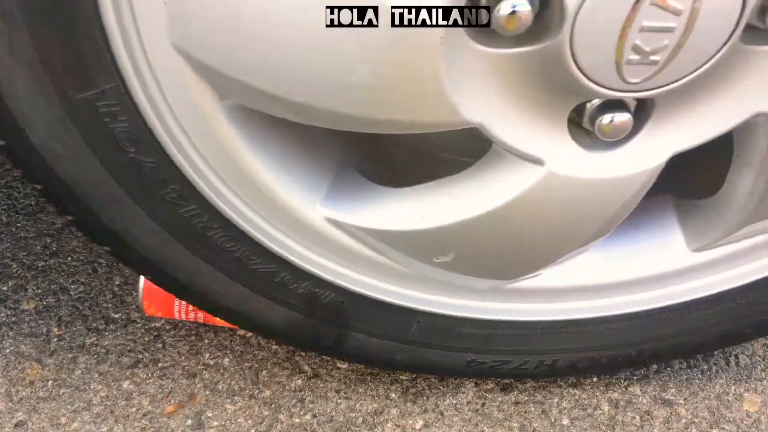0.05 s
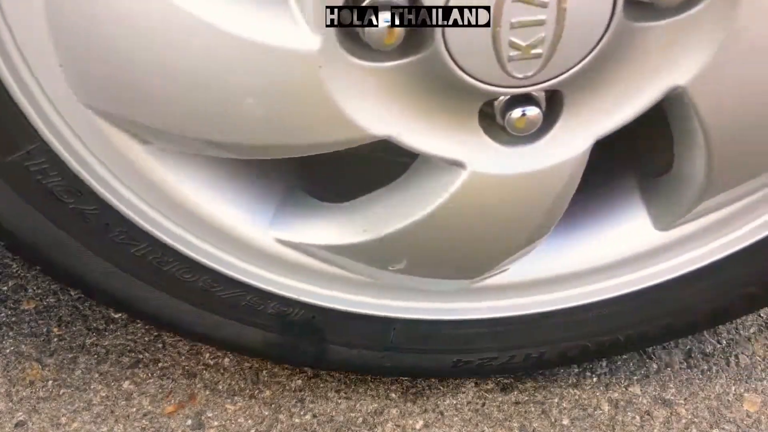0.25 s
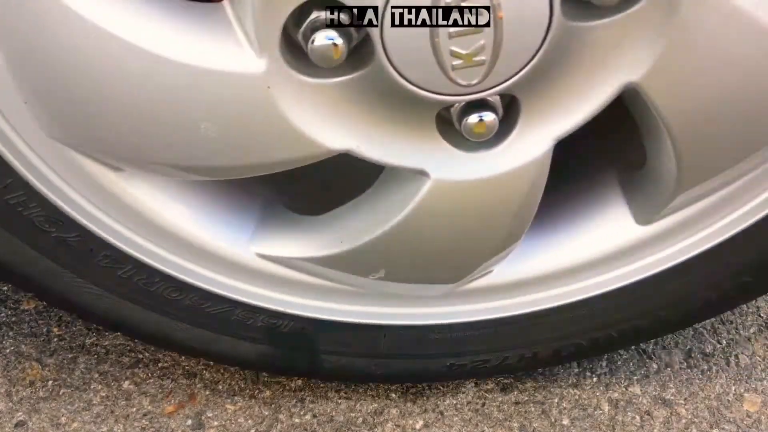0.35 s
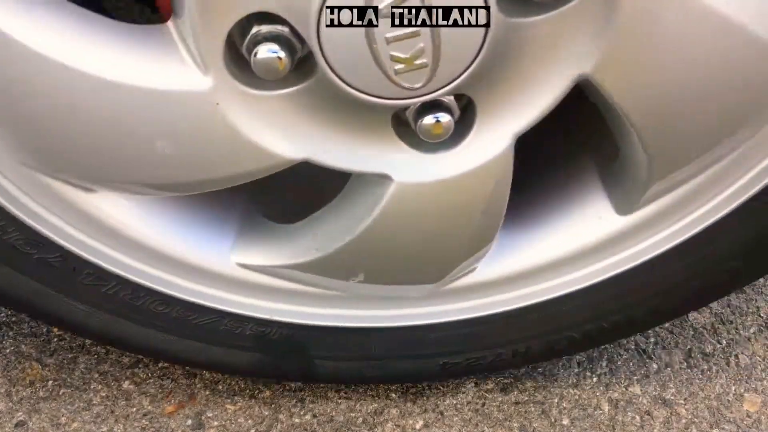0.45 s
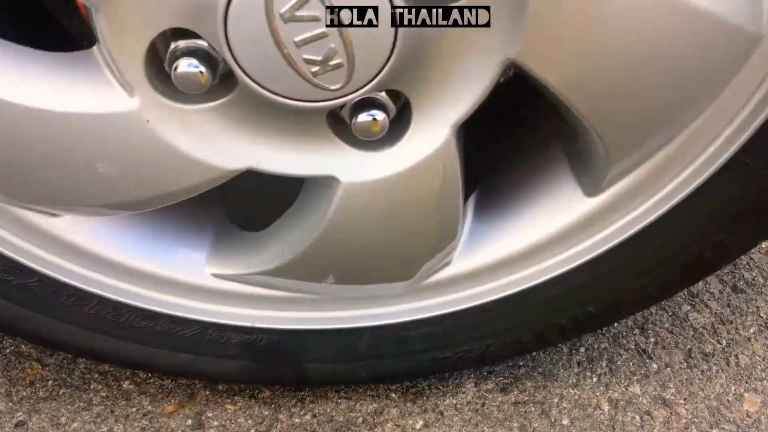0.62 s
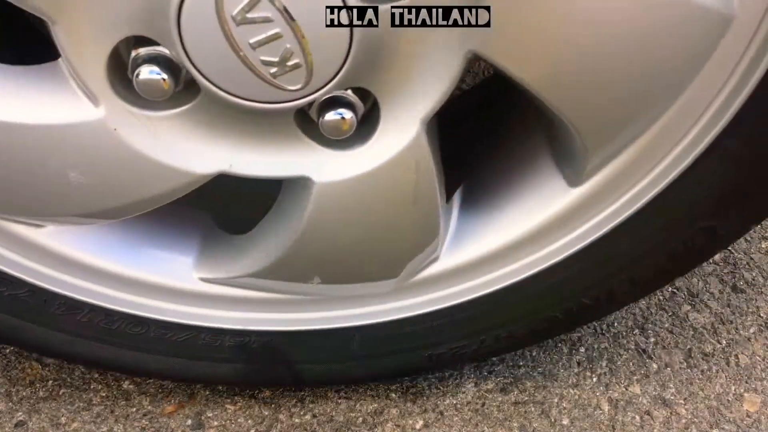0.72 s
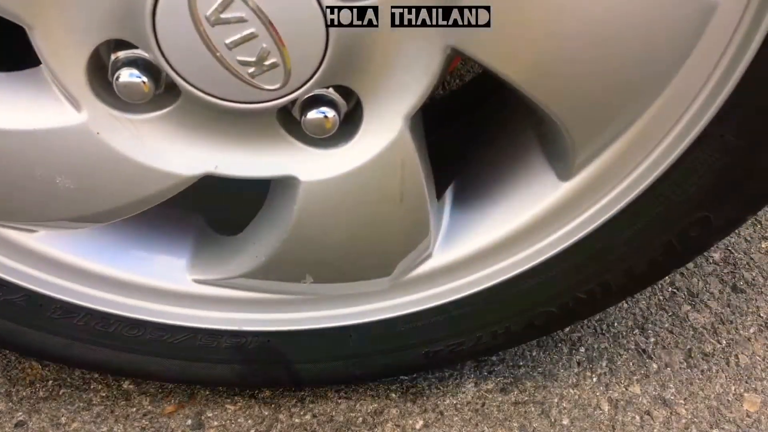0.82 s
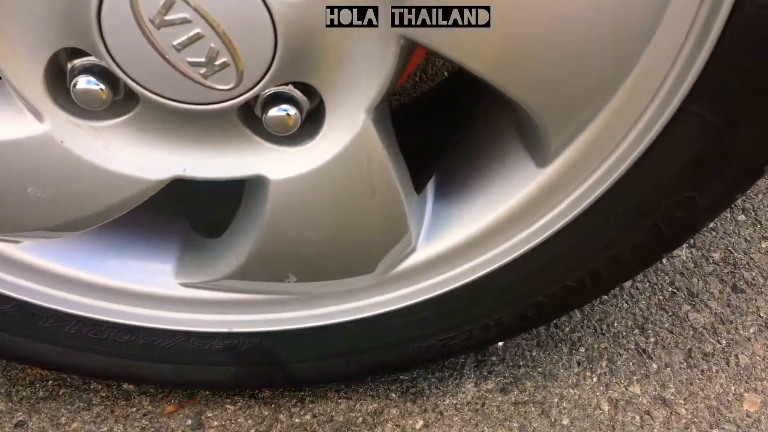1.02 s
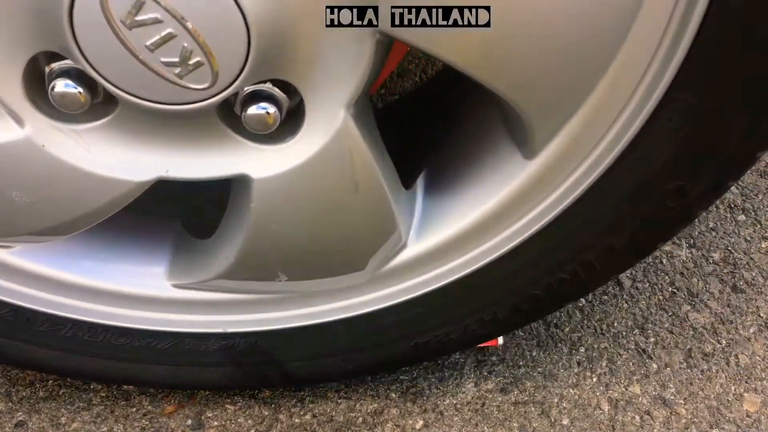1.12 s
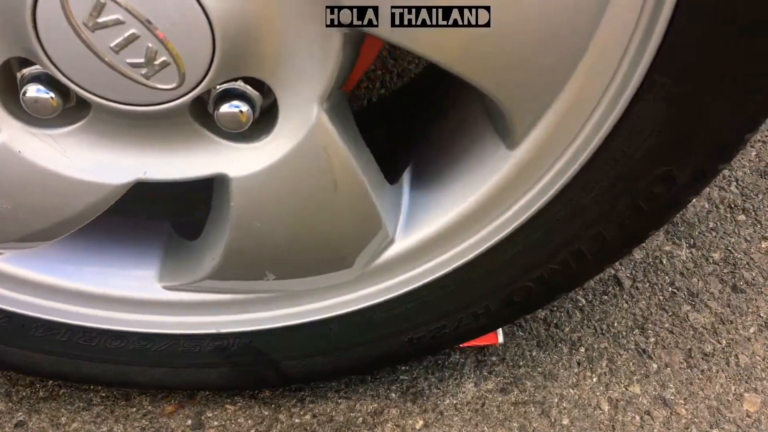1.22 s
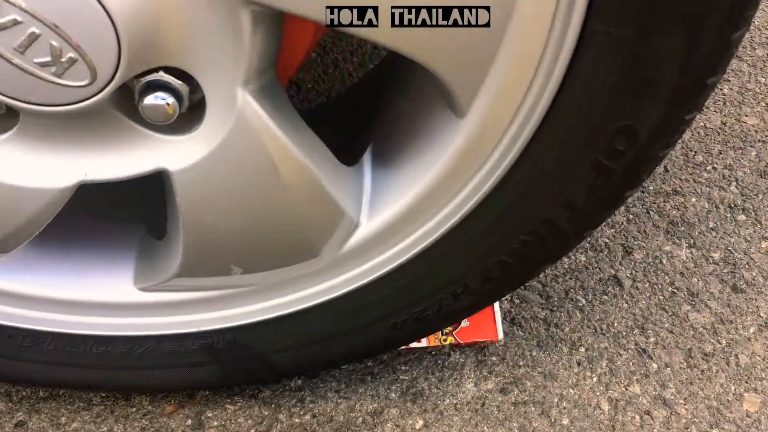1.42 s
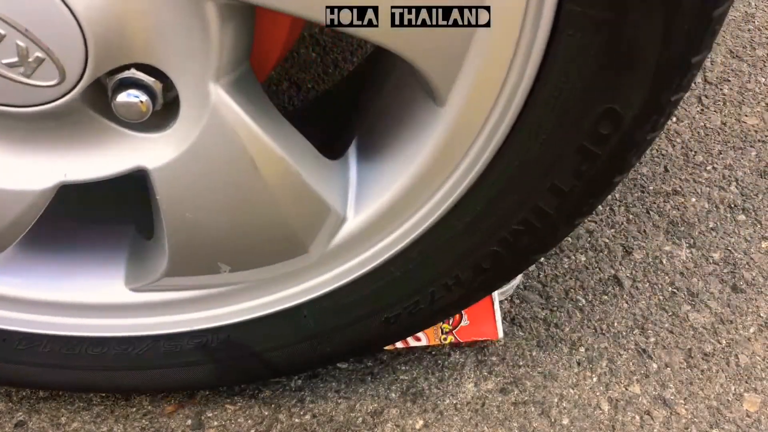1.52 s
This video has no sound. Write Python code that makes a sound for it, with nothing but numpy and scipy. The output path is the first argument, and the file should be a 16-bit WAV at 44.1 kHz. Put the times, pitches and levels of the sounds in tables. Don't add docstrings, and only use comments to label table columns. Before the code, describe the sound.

Cardboard tube bursts under a slow rolling tyre with a hissing rush, sharp pop and later snaps

```python
import sys
import numpy as np
from scipy import signal
from scipy.io import wavfile
from scipy.ndimage import uniform_filter1d, map_coordinates

SR = 44100
rng = np.random.default_rng(int(sys.argv[2]) if len(sys.argv) > 2 else 0)


def put_to_file(sound):
    columns = np.atleast_2d(sound).T
    safe = np.clip(columns, -1, 1)
    whole_steps = np.round(safe * 32767)
    wavfile.write(sys.argv[1], SR, whole_steps.astype(np.int16))


def boost_factor(decibels):
    exponent = np.asarray(decibels, float) / 20
    return 10 ** exponent


N = 68355

# time_s, level_db
FLOW = [
    (0.03, -45.5),
    (0.136, -36.5),
    (0.192, -34),
    (0.292, -26.5),
    (0.346, -22.5),
    (0.36, -27.5),
    (0.37, -27),
    (0.378, -38),
    (0.42, -61),
]
# pitch_hz, width_hz, level_db, reached_s
GAP_WHISTLES = [(2670, 750, -1, 0.26), (5600, 760, 0.5, 0.17), (7140, 390, -4.5, 0.27),
                (8530, 350, 0.5, 0.26), (8980, 470, 3, 0.27), (10060, 260, 0.5, 0.32),
                (10880, 380, -1.5, 0.31), (11700, 370, -0.5, 0.11), (13760, 350, 3, 0.21),
                (14450, 350, 2, 0.31), (15400, 560, 3, 0.273)]
# pitch_hz, width_hz, level_db, centre_s, length_s
BRIEF_WHISTLES = [(4170, 120, -7.5, 0.194, 0.039), (3700, 77, -9, 0.225, .025), (4230, 130, -11, .25, .015),
                  (5100, 92, -15, 0.246, 0.029), (3350, 120, -9, 0.276, 0.017),
                  (3100, 110, -6.5, 0.274, 0.026), (1960, 150, -9, 0.3, 0.019), (4930, 90, -13, 0.282, .04),
                  (4060, 300, -4, 0.3097, 0.025), (3446, 120, -11, 0.292, 0.029),
                  (3050, 180, -8.5, 0.337, .016), (5150, 150, -9, 0.65, .008), (6960, 120, -7, 0.322, .02),
                  (6430, 90, -14, 0.3, 0.02), (8500, 87, -13.5, 0.31, 0.017),
                  (9640, 190, -5.5, 0.327, .025), (10300, 70, -6, 0.314, 0.028), (14760, 90, -8, .32, .025)]
# pitch_hz, width_hz, depth (0-1)
GAP_NOTCHES = [(4650, 300, .6), (5550, 350, 0.85), (7800, 190, 0.8), (11250, 450, 1), (11950, 200, 0.7),
               (12850, 250, .9)]
WHISTLE_APPROACH_S, WHEEL_ECHO_T60_S, WHEEL_ECHO_SHARE = 0.094, 0.03, .45
TREBLE_HZ, TREBLE_OPENS_S, TREBLE_SHUT = 14100, 0.175, 0.79
GAP_GLIDE = .002

CHIRP_START_S, CHIRP_LENGTH_S, CHIRP_DB, CHIRP_FADE_DB = .114, 0.046, -27, -5
CHIRP_START_HZ, CHIRP_RISE_HZ_PER_S = 234, 5570
KNOCK_HZ, KNOCK_DB = 163, -30
# centre_s, level_db, length_ms
DENTS = [
    (.1142, -28, 2.0),
    (.1683, -34, 2.2),
]

# start_s, push_db, contact_ms, rebound (0-1)
POP = [(0.3543, -3.5, 0.4, 0.6), (0.3552, -10.5, 0.24, 0.3), (.3581, -9.5, .95, 0.2),
       (0.3635, -4.5, 0.19, 0.1), (.3672, -9, .7, 0.01), (.3678, -8.5, .8, .01), (0.3742, -15.5, 1.5, 0.3),
       (0.3772, -21, 1.54, 0), (.3915, -19, 1.4, 0.2), (.3948, -27, 1.3, .8), (.4040, -20, 2.0, 0.62),
       (0.4108, -26, 1.98, .9), (.443, -32, 2.24, 0.64)]
# centre_s, level_db, length_ms
BULGES = [
    (.3558, -16, .8),
    (.3650, -14.5, 2.6),
    (.3666, -8, .4),
    (.3722, -14, 2.0),
]
# pitch_hz, level_db, t60_s
BODY_MODES = [(77.8, -23.5, 0.62), (147, -28, 0.26), (206, -48, 0.043), (266.5, -27, 1), (332, -26, 0.11),
              (470, -22, 0.048), (748, -35, 0.077), (1107, -30, 0.024), (1560, -30.5, 0.016),
              (2475, -27, 0.025), (3460, -34, 0.017)]
BODY_HIGHPASS_HZ = 77
SCUFF_DB, SCUFF_T60_S, SCUFF_HZ = -37.5, 0.074, 1370

# start_s, peak_db, pitch_hz, treble_db, t60_s
SNAPS = [(.031, -35, 1600, -21, 0.037), (.060, -31.5, 2030, -17, 0.035), (0.064, -31, 1980, -18, .02),
         (0.0727, -24, 1810, -28, 0.02), (0.0765, -26.5, 1960, -28, 0.02), (0.0833, -31, 1950, -25, 0.013),
         (0.0872, -35, 2040, -23, 0.022), (0.0951, -30, 1930, -25, 0.033), (0.1142, -30, 1306, -25, 0.032),
         (0.1669, -30.5, 1280, -15, 0.013), (0.436, -34, 900, -15, 0.034), (0.5439, -45, 1320, -4.5, 0.016),
         (0.7198, -43, 3000, -1, 0.0069), (0.739, -36.5, 1324, -19, 0.044), (0.799, -36, 1270, -10, 0.045),
         (0.886, -38.5, 1370, -11, 0.021), (1.076, -33, 1280, -27, 0.054), (1.106, -26, 1580, -23, 0.014),
         (1.109, -31.5, 1136, -32, 0.03), (1.1119, -31, 1166, -32, 0.041),
         (1.1516, -31, 1910, -11.5, 0.027), (1.1545, -40, 2500, -19, .03), (1.197, -40, 3700, -22, .02),
         (1.2118, -22, 1970, -19, 0.021), (1.2122, -36.5, 3850, -18, 0.012),
         (1.2141, -29, 2760, -20, 0.011), (1.2164, -34.5, 1324, -20, 0.061),
         (1.2214, -34, 2030, -24, 0.037)]
SNAP_TICK_DB, SNAP_THUD_DB = -3, -27
SNAP_TAIL_DB, SNAP_TAIL_RATIO = -15.5, 2.6
# centre_s, level_db, length_ms
CRACKS = [
    (1.1056, -24, .19),
    (1.1516, -35, .14),
    (1.1630, -39, .2),
    (1.2128, -30, .13),
]
CRACK_BEFORE, CRACK_AFTER = .3, .35

# start_s, peak_db
TICKS = [(.7585, -38), (.7962, -39), (.8168, -37), (.8236, -33), (.832, -39), (.838, -39), (.8414, -34),
         (.8608, -29.5), (.8625, -37)]
TICK_HZ, TICK_T60_S = 3200, .0045
# centre_s, level_db, length_s
PUFFS = [(0.566, -54, 0.011), (0.706, -51, 0.0063), (0.819, -52.5, 0.026), (0.851, -51.5, 0.0094),
         (0.992, -49.5, 0.007), (1.133, -52.5, 0.01), (1.275, -50, 0.01), (1.414, -50, 0.0075),
         (1.501, -58, 0.004)]
PUFF_HZ, PUFF_AIR_DB = 3160, -7.5
GRIT_PER_S, GRIT_DB, GRIT_SPREAD_DB, GRIT_HZ = 660, -59.5, 3.5, 3200

FIRING_HZ, FIRING_DB, FIRING_SCATTER_DB = 29.07, -51, 1.5
# pitch_hz, width_hz, level_db
EXHAUST = [
    (59.7, 30.4, 2),
    (82.7, 24, -2),
    (128.7, 37, -3.5),
    (204, 40, -10),
    (434, 43, -18.5),
]
# pitch_hz, density_db (per Hz)
BAY = [(18, -31), (30, 3), (209, -3), (318, -12.5), (459, -9), (775, -10.5), (1310, -14.5), (1610, -14.5),
       (15800, -38)]
BAY_DB, BAY_SWELL_DB, BAY_FLICKER_DB = -47.5, .4, 1.5
# pitch_hz, width_hz, level_db
BAY_HUMS = [
    (456, 61, -65),
    (1280, 104, -58.5),
    (2526, 67, -67.5),
    (5010, 160, -68.5),
]
HUM_FLICKER_DB = 1.2

# time_s, gain_db
GAIN = [
    (0, 2.5),
    (.36, 2),
    (.40, 2),
    (.55, -3.5),
    (.655, -6.5),
    (.69, 2),
    (1.55, 1),
]
GRIT_GAIN_SHARE, MIC_GAIN_SHARE = .7 - .5, 0.96
MIC_HISS_DB = -66.5
PHONE_TOP_HZ = 15680


def level(x, db):
    return x * boost_factor(db) / np.sqrt(np.mean(x ** 2))


def curve(table):
    return np.interp(np.arange(N) / SR, [row[0] for row in table], [row[1] for row in table])


def white():
    return rng.standard_normal(N)


def band(x, hz, width):
    return signal.lfilter(*signal.iirpeak(min(hz, .45 * SR), hz / width, fs=SR), x)


def steep(x, hz, width):
    return band(band(x, hz, width), hz, width * 1.34)


def ring(x, hz, t60):
    radius = np.exp(-np.log(1000) / (t60 * SR))
    angle = 2 * np.pi * hz / SR
    return signal.lfilter([0, np.sin(angle)], [1, -2 * radius * np.cos(angle), radius * radius], x)


def fade(t, t60):
    return (t >= 0) * boost_factor(-60 * np.clip(t, 0, 2) / t60)


def bump(s, ms):
    return np.exp(-((np.arange(N) / SR - s) / (ms / 2000)) ** 2)


def walk(rate):
    hold = int(SR / rate)
    steps = np.repeat(rng.standard_normal(N // hold + 1), hold)
    return 1.33 * uniform_filter1d(uniform_filter1d(steps, hold), hold)[:N]


def leak():
    t = np.arange(N) / SR
    air = level(band(white(), 6800, 18300), 0)
    for hz, width, db, s in GAP_WHISTLES:
        near = -8 * np.clip(((t - s) / WHISTLE_APPROACH_S) ** 2, 0, 1.5)
        air = air + boost_factor(db - 5 + near + walk(39.6)) * level(band(white(), hz, width), 0)
    for hz, width, db, s, length in BRIEF_WHISTLES:
        swell = np.exp(-((t - s) / length) ** 2)
        air = air + boost_factor(db) * swell * level(steep(white(), hz, width), 0)
    for hz, width, depth in GAP_NOTCHES:
        air = air - depth * band(air, hz, width)
    air = air / np.std(air[int(.3 * SR):int(.34 * SR)])
    echo = rng.standard_normal(2000) * fade(t[:2000], WHEEL_ECHO_T60_S)
    echoed = signal.fftconvolve(air, echo / np.linalg.norm(echo))[:N]
    air = np.sqrt(1 - WHEEL_ECHO_SHARE ** 2) * air + WHEEL_ECHO_SHARE * echoed
    shut = TREBLE_SHUT * np.clip((TREBLE_OPENS_S - t) / 0.025, 0, 1)
    air = air - shut * band(air, TREBLE_HZ, 9600)
    drift = np.cumsum(GAP_GLIDE * np.clip((t - .27) / .1, -2, 1))
    air = map_coordinates(air, [np.arange(N) + drift], mode="mirror")
    return air * boost_factor(curve(FLOW)) * (t < FLOW[-1][0])


def chirp():
    t = np.arange(N) / SR - CHIRP_START_S
    shape = np.clip(np.minimum(t / .001, (CHIRP_LENGTH_S - t) / 0.0017), 0, 1)
    shape = shape * boost_factor(CHIRP_FADE_DB * np.clip(t / CHIRP_LENGTH_S, 0, 1))
    phase = 2 * np.pi * (CHIRP_START_HZ * t + CHIRP_RISE_HZ_PER_S * t ** 2 / 2) + 0.27 * walk(300)
    tone = boost_factor(CHIRP_DB + 0.82 * walk(253)) * shape * (np.cos(phase) + 0.12 * np.cos(2 * phase))
    knock = boost_factor(KNOCK_DB) * fade(t, 0.036) * np.sin(2 * np.pi * KNOCK_HZ * t)
    dents = sum(boost_factor(db) * bump(s, ms) for s, db, ms in DENTS)
    return knock - dents - tone


def pop():
    t = np.arange(N) / SR
    push, scuff = 0, 0
    for s, db, ms, rebound in POP:
        push = push + boost_factor(db) * (rebound * bump(s + ms / 1000, ms) - bump(s, ms))
        scuff = scuff + boost_factor(db) * fade(t - s, SCUFF_T60_S) / ms
    push = push + sum(boost_factor(db) * bump(s, ms) for s, db, ms in BULGES)
    body = sum(boost_factor(db) * ring(push, hz, t60) * hz / SR * 10 for hz, db, t60 in BODY_MODES)
    highpass = signal.butter(2, BODY_HIGHPASS_HZ, "high", fs=SR, output="sos")
    near = signal.sosfilt(highpass, push + body)
    return near + boost_factor(SCUFF_DB) * scuff * level(steep(white(), SCUFF_HZ, 1370), 0)


def snaps():
    t, out = np.arange(N) / SR, 0
    noise, chance = white(), rng.standard_normal((len(SNAPS), 2))
    treble = level(band(noise, 12000, 9400), SNAP_TICK_DB)
    for (s, db, hz, treble_db, t60), (detune, detune_top) in zip(SNAPS, chance):
        kick = (.15 * noise - 1) * fade(t - s, 0.00079)
        body = ring(kick, hz, t60)
        body = body + 0.42 * ring(kick, hz * (1.219 + 0.101 * detune), t60 * 0.47)
        body = body + 1.2 * ring(kick, hz * (2.0 + 0.02 * detune_top), t60 * 0.6)
        body = body / np.abs(body).max()
        thud = ring(np.abs(kick), hz * 0.39, 0.015)
        thud = boost_factor(SNAP_THUD_DB) * thud / np.abs(thud).max()
        tick = boost_factor(treble_db) * treble * fade(t - s, 1.16 * t60)
        rustle = level(steep(noise[::-1], hz * 0.92, hz * 1.07), SNAP_TAIL_DB)
        tail = rustle * fade(t - s, SNAP_TAIL_RATIO * t60)
        out = out + boost_factor(db) * (body - thud + tick + tail)
    return out


def cracks():
    out = 0
    for s, db, ms in CRACKS:
        flanks = CRACK_BEFORE * bump(s - 2 * ms / 1000, ms) + CRACK_AFTER * bump(s + ms / 1000, ms)
        out = out + boost_factor(db) * (flanks - bump(s, ms))
    return out


def ticks():
    kick = np.zeros(N)
    for s, db in TICKS:
        kick[int(s * SR)] = boost_factor(db)
    upper = 0.3 * ring(kick, 1.66 * TICK_HZ, TICK_T60_S)
    lower = 0.49 * ring(kick, 0.71 * TICK_HZ, TICK_T60_S)
    return ring(kick, TICK_HZ, TICK_T60_S) - upper + lower


def puffs():
    t, noise = np.arange(N) / SR, white()
    shape = sum(boost_factor(db) * np.exp(-((t - s) / length) ** 2) for s, db, length in PUFFS)
    tone = level(steep(noise, PUFF_HZ, 1300), 0) + level(steep(noise, 5100, 720), -18)
    tone = tone + level(band(noise, 5300, 9000), PUFF_AIR_DB)
    return shape * boost_factor(2.6 * walk(300)) * tone


def grit():
    hit = rng.random(N) < GRIT_PER_S / SR * boost_factor(6.0 * walk(18))
    strength = boost_factor(GRIT_SPREAD_DB * np.minimum(rng.exponential(size=N), 2.5))
    clicks = hit * strength * white()
    out = band(clicks, GRIT_HZ, 1130) + .5 * band(clicks, 4060, 670) + band(clicks, 1390, 130)
    return level(out + 0.061 * clicks, GRIT_DB)


def exhaust():
    chance = rng.standard_normal((60, 2))
    at = (np.arange(len(chance)) + 0.027 * chance[:, 0] + 0.1466) / FIRING_HZ
    inside = at < N / SR
    pulses = np.zeros(N)
    pulses[(at[inside] * SR).astype(int)] = boost_factor(FIRING_SCATTER_DB * chance[inside, 1])
    out = 0
    for hz, width, db in EXHAUST:
        out = out + boost_factor(db) * band(band(pulses, hz, width), hz, 2 * width) * hz / width
    return level(out, FIRING_DB)


def engine_bay():
    bay, swell = 0, walk(6.8)
    table_hz, table_db = np.array(BAY).T
    for hz in 32 * 2 ** np.arange(0, 9.1, 1 / 3):
        db = np.interp(np.log(hz), np.log(table_hz), table_db)
        db = db + BAY_SWELL_DB * swell + BAY_FLICKER_DB * walk(14.17)
        bay = bay + boost_factor(db) * band(band(white(), hz, hz / 3), hz, hz / 2)
    return level(bay, BAY_DB)


def hums():
    out = 0
    for hz, width, db in BAY_HUMS:
        out = out + boost_factor(HUM_FLICKER_DB * walk(18.6)) * level(steep(white(), hz, width), db)
    return out


def mic_hiss():
    return level(steep(white(), 12000, 16000), MIC_HISS_DB)


def scene():
    gain_db = curve(GAIN)
    car = exhaust() + engine_bay() + boost_factor(GRIT_GAIN_SHARE * gain_db) * grit() + hums()
    background = boost_factor(gain_db) * car + boost_factor(MIC_GAIN_SHARE * gain_db) * mic_hiss()
    tube = leak() + chirp() + pop() + snaps() + cracks()
    tread = puffs() + ticks()
    return (tube + tread + background)[None]


def band_limit(x):
    return signal.sosfilt(signal.butter(12, 16530, fs=SR, output="sos"), x)


def record(dry):
    lowpass = signal.ellip(14, .2, 90, PHONE_TOP_HZ, fs=SR, output="sos")
    mix = signal.sosfilt(lowpass, dry)
    return band_limit(mix)


dry = scene()
out = record(dry)
put_to_file(out)
```